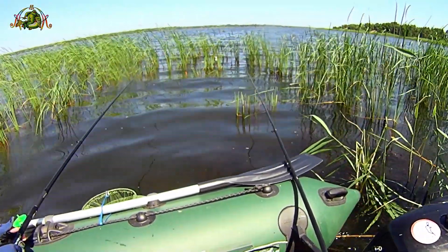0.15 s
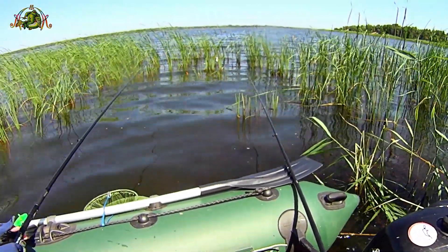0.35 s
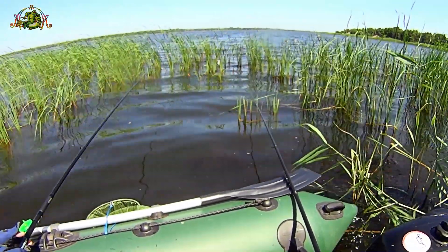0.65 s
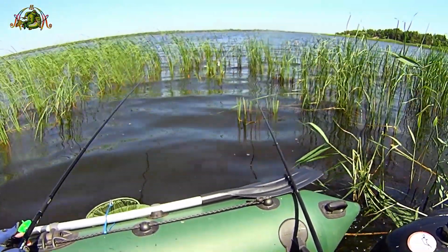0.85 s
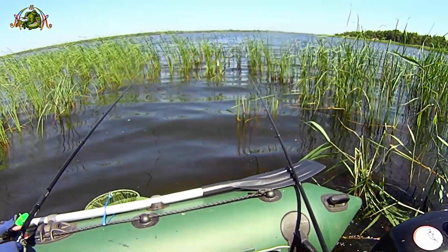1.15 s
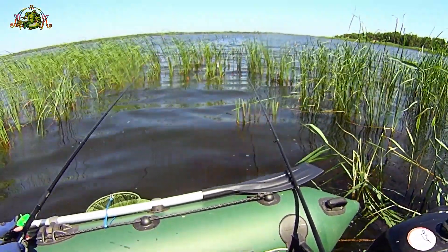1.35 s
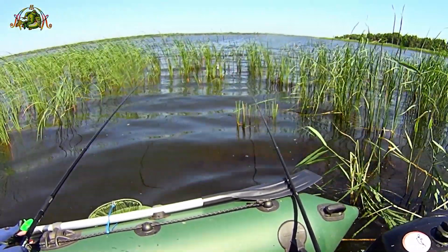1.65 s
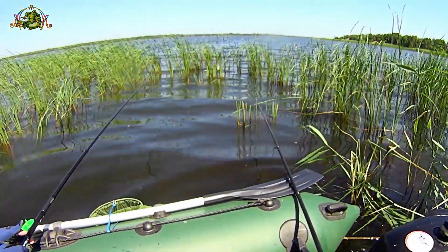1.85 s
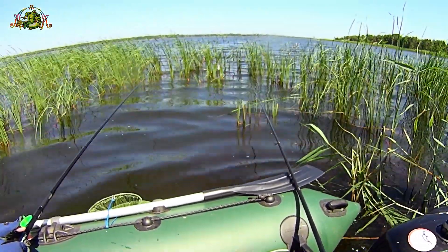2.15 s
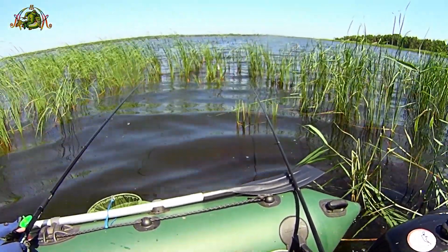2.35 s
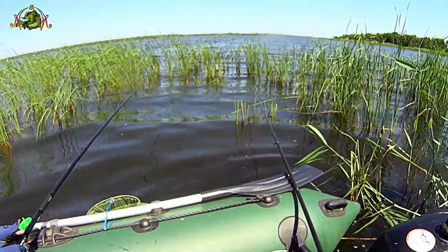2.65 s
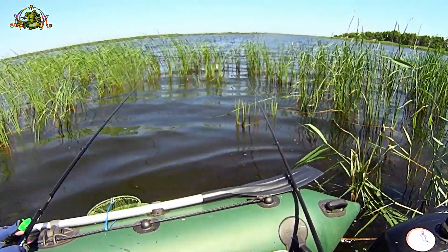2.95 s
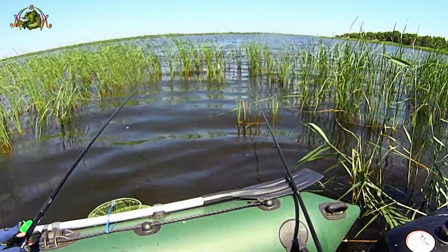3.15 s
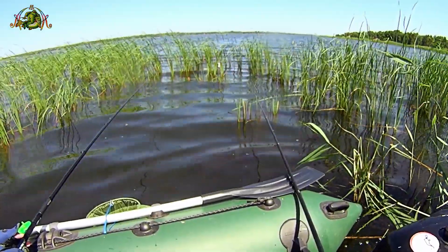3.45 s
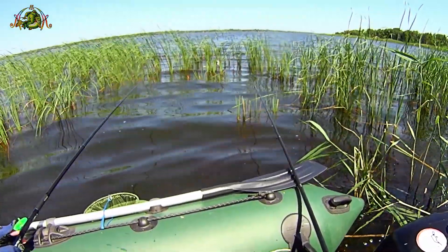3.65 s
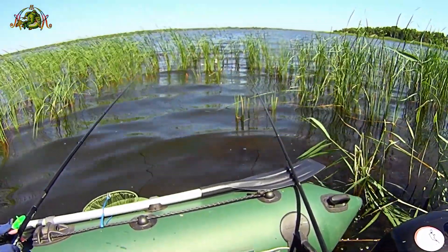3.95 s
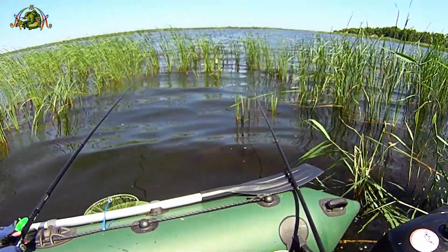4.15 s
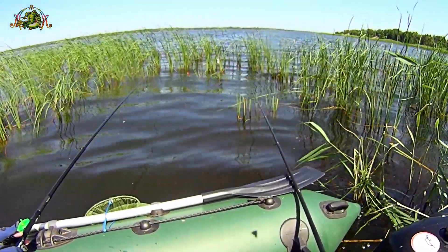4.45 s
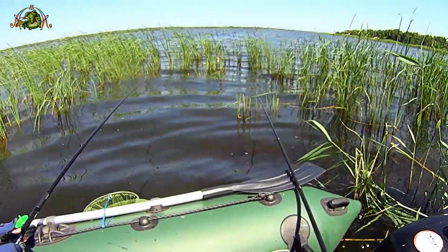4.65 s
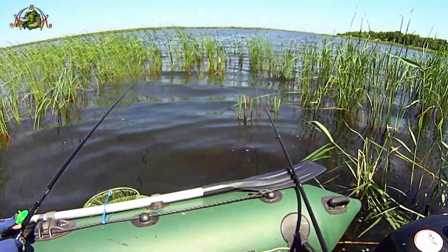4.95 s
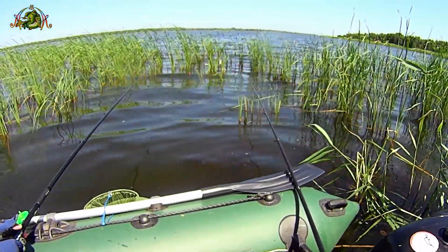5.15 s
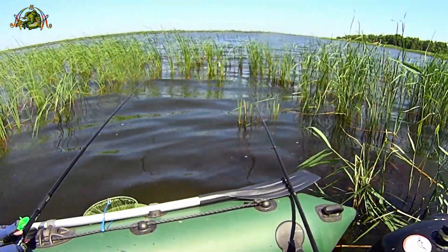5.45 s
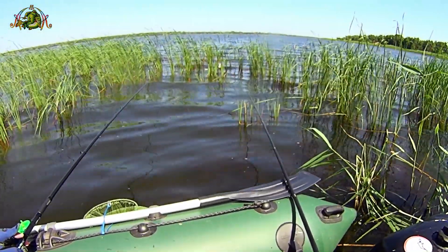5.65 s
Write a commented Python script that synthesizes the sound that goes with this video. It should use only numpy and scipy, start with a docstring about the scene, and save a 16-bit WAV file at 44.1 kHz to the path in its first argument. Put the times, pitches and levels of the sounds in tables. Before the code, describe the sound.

A small warbler sings in lakeside reeds, fairly close and slightly left, its notes lightly scattered by the stems. Soft chips come at 0.2 and 0.5 seconds, a faint rattle near 1.1, two more chips around 1.3 and a thin squeak at 1.6. From 1.9 to 2.8 seconds it gives four louder, ratcheting croaks, each rising slightly. A squeaky whistle follows at 3.0, then four harsh, quick rattles from 3.3 to 4.1. A cluster of squeaks jumps in pitch between 4.2 and 4.7. Four shorter rattles run from 4.8 to 5.5, and a last squeak sounds near 5.8. Tiny water drips tick during the first 1.6 seconds, and wavelets nudge a rubber boat with very faint low thuds at 1.3 and 2.2. A soft, wide hiss, a faint low hum and distant warbler chatter continue throughout.

```python
"""Reed warbler beside a rubber boat.

On a quiet lake the bird sings chips, low croaks and harsh rattles: runs of short tone puffs
with a rasp. Squeaky whistles come between them, and the reed stems scatter the song.
Water drips and nudges the hull over a soft hiss, a faint hum and far warblers."""
import sys
import numpy as np
from scipy import signal
from scipy.fft import rfft, irfft
from scipy.io import wavfile

SR = 44100
rng = np.random.default_rng(int(sys.argv[2]) if len(sys.argv) > 2 else 0)


def store_pcm(level_fs):
    """Save levels as 16-bit WAV."""
    pcm = np.round(np.clip(level_fs, -1, 1) * 32767).astype(np.int16)
    wavfile.write(sys.argv[1], SR, np.atleast_2d(pcm).T)


N = 255735
TIME = np.arange(N) / SR
FREQS = np.fft.rfftfreq(2 * N, 1 / SR)


def from_db(db):
    """Decibels to gain."""
    return 10 ** (np.asarray(db) / 20)


def unit_rms(x):
    """Scale to rms 1."""
    return x / np.sqrt(np.mean(x ** 2) + 1e-20)


def at_hz(table, hz, column=1):
    """Interpolate a table column over log frequency."""
    table = np.array(table)
    return np.interp(np.log(hz + 1e-3), np.log(table[:, 0]), table[:, column])


def filtered(x, response):
    """Apply a frequency response given on FREQS."""
    return irfft(rfft(x, 2 * N) * response)[..., :N]


def noise(response):
    """Filtered white noise, rms 1."""
    return unit_rms(filtered(rng.standard_normal(N), response))


def coloured(spectrum):
    """Noise shaped by rows of (Hz, dB), rms 1."""
    return noise(from_db(at_hz(spectrum, FREQS)))


def band(hz, width_oct):
    """Noise in a bell around hz, rms 1."""
    return noise(np.exp(-(np.log2((FREQS + 1) / hz) / width_oct) ** 2 / 2))


def drift(rate_hz):
    """Random wander up to about rate_hz, rms 1."""
    return noise(1 / (1 + (FREQS / rate_hz) ** 2))


def hiss(mid_db=-55.5, side_db=-55):
    """Wide, steady hiss: one part common to both channels, one opposed."""
    # Each row: frequency in Hz, relative noise density in dB.
    mid_spectrum = [(15, -18), (25, -6), (101, -5), (134, -7), (202, -5), (267, -6), (1300, -10),
                    (1400, -10), (5120, -8.5), (11000, -15), (14300, -104), (22000, -120)]
    side_spectrum = [(15, -47), (25, -13), (107, -15), (202, -7.5), (619, -3.5), (759, -4.5), (884, -3.5),
                     (7320, -13), (11000, -37), (14300, -71), (22000, -120)]
    mid = from_db(mid_db) * coloured(mid_spectrum)
    side = from_db(side_db) * coloured(side_spectrum)
    return np.array([mid + side, mid - side])


def hum(hz=133.7, db=-68, waver_hz=1.7, waver_db=2):
    """Faint hum, wavering in level and pitch."""
    gain = from_db(db + waver_db * drift(35))
    return gain * np.sin(2 * np.pi * np.cumsum(hz + waver_hz * drift(1.57)) / SR)


def far_warblers(db=-63, hz=2700, width_oct=0.25, chatter_hz=16, chatter_db=5):
    """Warblers deep in the reeds merge into a faint, restless chatter."""
    gain = from_db(db + chatter_db * drift(chatter_hz))
    return gain * np.array([band(hz, width_oct), band(hz, width_oct)])


def hull(tube_hz=116, width_s=0.024):
    """The boat's air tube answers each wavelet with a soft low note."""
    # Each row: centre time in seconds, peak level in dB.
    nudges = [(1.321, -60), (2.21, -56.5)]
    out = np.zeros(N)
    for centre_s, db in nudges:
        t = TIME - centre_s
        out += from_db(db) * np.exp(-(t / width_s) ** 2 / 2) * np.sin(2 * np.pi * tube_hz * t)
    return out


def drips(decay_s=0.0083, width_oct=0.84):
    """Tiny splashes and stem ticks: milliseconds of bright crackle."""
    # Each row: start in seconds, level in dB, band centre in Hz.
    ticks = [(0.051, -51.5, 6200), (0.416, -44.5, 5840), (0.542, -50.5, 5635), (0.704, -51, 5600),
             (1.249, -46.5, 5670), (1.393, -48, 5170), (1.585, -44.5, 3780)]
    out = np.zeros(N)
    for start_s, db, hz in ticks:
        decay = (TIME > start_s) * np.exp(-np.abs(TIME - start_s) / decay_s)
        out += from_db(db) * decay * band(hz, width_oct)
    return out


def reeds(x, near_db=-14, near_t60_s=0.1, far_db=-19, far_t60_s=0.47, build_s=0.0052):
    """Close stems scatter the sound at once; the wider reed bed returns a faint tail."""
    impulse = 0
    for db, t60_s in ((near_db, near_t60_s), (far_db, far_t60_s)):
        envelope = np.exp(-np.log(1000) * TIME / t60_s) * (1 - np.exp(-TIME / build_s))
        echoes = rng.standard_normal((2, N)) * envelope
        impulse += from_db(db) * unit_rms(echoes) / np.sqrt(N)
    return filtered(x, rfft(impulse, 2 * N))


def from_the_left(x):
    """The song reaches the left channel earlier and mostly louder."""
    # Each row: frequency in Hz, left phase lead in radians, left minus right in dB.
    bearing = [(2330, 1.93, 0.5), (2720, 2.34, 2.5), (2780, 3.5, 5.5), (3374, 1.37, -1), (4330, 3.72, 7),
               (5000, 5.73, 2)]
    lead_rad, louder_db = at_hz(bearing, FREQS), at_hz(bearing, FREQS, column=2)
    left = from_db(louder_db / 2) * np.exp(0.5j * lead_rad)
    return filtered(x, np.array([left, 1 / left]))


def whistles(edge_s=0.024, scatter=0.132, droop=0.022, droop_s=0.004, waver_db=1.2, harmonics=8):
    """Harmonic squeaks shaped by the throat; an unsteady pitch smears them into a screech."""
    # Whistles and their rough onsets. Each row: start and end in seconds, start and end pitch in Hz,
    # level in dB, tilt in dB per octave, roughness from 0 to 1.
    notes = [ (1.596, 1.682, 1363, 1386, -41, 3, 0.11), (2.977, 3.025, 1420, 1363, -40, 1, 0.65),
             (2.989, 3.085, 1319, 1290, -34, 0.5, 0.02), (3.07, 3.109, 1288, 1270, -42.5, 10.5, .1),
             (4.249, 4.316, 1483, 1447, -37, 5.5, 0.51), (4.312, 4.352, 1863, 1867, -34.5, 1.5, 0.11),
             (4.36, 4.441, 1454, 1402, -31, 1.5, 0.11), (4.517, 4.564, 2360, 2390, -34, 3.5, 0.43),
             (4.547, 4.62, 1763, 1803, -33, 4.5, 0.13), (4.62, 4.696, 1378, 1412, -31.5, 1, 0.12),
             (5.711, 5.806, 1356, 1388, -46.5, -6, 0.58), (5.749, 5.83, 1392, 1389, -35, 6, 0.22)]
    # Response of throat and open bill. Each row: frequency in Hz, gain in dB.
    throat = [(1350, -22.5), (1800, -18.5), (2300, -8), (2620, 4), (3200, -17.5), (3700, 11), (4250, -3),
              (4700, 1), (5300, -10.5), (6400, -25.5), (8600, -45), (10400, -25.5), (11500, -50)]
    out, shake = np.zeros(N), drift(466)
    wavers_db = [waver_db * drift(70) for _ in range(harmonics)]
    for start_s, end_s, start_hz, end_hz, db, tilt_db_per_oct, roughness in notes:
        on = (TIME > start_s) & (TIME < end_s)
        t = TIME[on]
        glide_hz = np.interp(t, [start_s, end_s], [start_hz, end_hz])
        sag = droop * np.exp((t - end_s) / droop_s)  # pressure drops at the end
        hz = glide_hz * np.exp(scatter * roughness * shake[on] - sag)
        phase = 2 * np.pi * np.cumsum(hz) / SR
        swell = np.sin(np.pi / 2 * np.clip(np.minimum(t - start_s, end_s - t) / edge_s, 0, 1))
        for k, wander_db in enumerate(wavers_db, 1):
            colour_db = at_hz(throat, k * hz) + tilt_db_per_oct * np.log2(k * hz / 3700)
            out[on] += swell * from_db(db + colour_db + wander_db[on]) * np.sin(k * phase)
    return out


def puff_run(start_s, end_s, db, swell_db, gap_s=0.0105):
    """Times and levels of evenly spaced puffs that rise by swell_db to db."""
    count = 1 + round((end_s - start_s) / gap_s)
    progress = np.linspace(1, 0, count)[::-1]  # a lone puff falls on end_s
    return start_s + progress * (end_s - start_s), db - swell_db * (1 - progress)


def syllable(times_s, levels_db, start_hz, end_hz, rasp_db):
    """One glide over some puffs. Each row: time in seconds, level in dB, pitch in Hz, rasp in dB."""
    pitches_hz = np.interp(times_s, times_s[[0, -1]], [start_hz, end_hz])
    return np.column_stack([times_s, levels_db, pitches_hz, np.full(len(times_s), rasp_db)])


def chip(start_s, end_s, db, start_hz, end_hz, rasp_db):
    """A lone pair of puffs."""
    return syllable(*puff_run(start_s, end_s, db, swell_db=1.5), start_hz, end_hz, rasp_db)


def croak(at_s, db, stretch, start_hz=2345, end_hz=2545, rasp_db=-21.5, fray_db_per_s=64):
    """A ratchet of beats on a rising pitch, loudest in the middle, raspiest at the end."""
    # Each row: start and end in seconds from at_s before stretching, relative end level in dB,
    # swell in dB.
    beats = [(-0.034, -0.017, -12.5, 4.5), (0.002, 0.011, -2.5, 1.5), (0.03, 0.043, 0, 2.5),
             (0.057, 0.058, -0.5, 0), (0.092, 0.11, -10, 0.5)]
    runs = [puff_run(from_s, to_s, db + end_db, swell_db) for from_s, to_s, end_db, swell_db in beats]
    offsets_s, levels_db = np.concatenate(runs, axis=1)
    frayed_db = rasp_db + fray_db_per_s * offsets_s
    return syllable(at_s + stretch * offsets_s, levels_db, start_hz, end_hz, frayed_db)


def rattle(start_s, end_s, lead_gap_s, db, start_hz, end_hz, rasp_db, accent_db=3.5, scratch_db=8.5):
    """Three slow, scratchy puffs swell into a quick run that ends on an accent."""
    run_s, run_db = puff_run(start_s, end_s, db, swell_db=0)
    run_db[-1] += accent_db
    ahead_s = lead_gap_s * np.arange(3, 0, -1)
    lead_db = db - 13 * (ahead_s / (end_s - start_s)) ** 1.5
    times_s, levels_db = np.r_[start_s - ahead_s, run_s], np.r_[lead_db, run_db]
    return syllable(times_s, levels_db, start_hz, end_hz, rasp_db + scratch_db * (times_s < start_s))


def song():
    """The puffs of all syllables in time order."""
    # Each row: time in seconds, level in dB, stretch factor.
    croaks = [(1.905, -17, 0.9), (2.15, -15.5, 0.99), (2.467, -15.5, .99), (2.715, -14.5, .86)]
    # Each row: run start, run end and lead-in gap in seconds, level in dB, start and end pitch in Hz,
    # relative rasp in dB.
    rattles = [ (1.061, 1.112, 0.018, -32.5, 2510, 2272, -13.5),
               (3.314, 3.369, 0.026, -19, 2613, 2482, -15), (3.532, 3.587, 0.02, -19, 2590, 2473, -14.5),
               (3.839, 3.899, 0.022, -20, 2737, 2461, -14), (4.056, 4.114, 0.023, -18.5, 2740, 2479, -15),
               (4.857, 4.889, 0.021, -19.5, 2550, 2588, -12.5),
               (5.016, 5.045, 0.016, -19, 2566, 2669, -13.5), (5.31, 5.337, 0.017, -20, 2660, 2512, -15),
               (5.48, 5.507, 0.0145, -19, 2614, 2521, -14)]
    # Each row: start and end in seconds, level in dB, start and end pitch in Hz, relative rasp in dB.
    chips = [(0.188, 0.197, -32, 2435, 2414, -16), (0.491, 0.499, -29.5, 2403, 2344, -17),
             (1.254, 1.268, -24, 2500, 2676, -13), (1.388, 1.396, -28, 2543, 2730, -7)]
    puffs = np.vstack([croak(*row) for row in croaks]
                      + [rattle(*row) for row in rattles]
                      + [chip(*row) for row in chips])
    return puffs[np.argsort(puffs[:, 0])]


def puff_train(times_s, levels_db, hz, width_s=0.0029, spread_s=0.0004, spread_db=1, spread_hz=35):
    """Tone and airflow envelope of uneven puffs; each starts more abruptly than it ends."""
    tone, power = np.zeros(N), np.zeros(N)
    for at_s, db in zip(times_s, levels_db):
        start_cycles, detune, late, strong = rng.standard_normal(4)
        span = slice(int((at_s - 0.012) * SR), int((at_s + 0.012) * SR))
        puff_s = width_s * np.exp(0.011 * (db + 20))  # strong puffs last longer
        age = (TIME[span] - at_s - spread_s * late) / puff_s
        steepness = np.where(age < 0, 4, 2.5)
        puff = from_db(db + spread_db * strong) * np.exp(-np.abs(age) ** steepness / 2)
        cycles = start_cycles + np.cumsum(hz[span] + spread_hz * detune) / SR
        tone[span] += puff * np.sin(2 * np.pi * cycles)
        power[span] += puff ** 2
    return tone, np.sqrt(power)


def turbulence(flow, rasp_db, trim_db=-3, leak_db=-6, smooth_hz=14):
    """Turbulent rasp; air leaks between the puffs, so it also swells with the whole note."""
    # Each row: frequency in Hz, relative noise density in dB.
    spectrum = [(1000, -50), (1350, -22), (1850, -84), (2150, 2.5), (2800, 16.5), (3400, 3), (3800, -2),
                (4300, -4.5), (4800, -15.5), (5300, -11.5), (6300, -20), (8200, -20), (11000, -24.5)]
    leak = np.abs(filtered(flow, np.exp(-(FREQS / smooth_hz) ** 2 / 2)))
    return (flow + from_db(leak_db) * leak) * from_db(rasp_db + trim_db) * coloured(spectrum)


def growl(flow, rasp_db, pitch_hz, base_db=-22, slack_hz=2500, slack_db_per_oct=85):
    """Slack membranes growl faintly below the tone, most in low, hoarse notes."""
    level_db = base_db + 0.82 * rasp_db + slack_db_per_oct * np.log2(slack_hz / pitch_hz)
    return flow * from_db(level_db) * band(hz=1420, width_oct=0.27)


def syrinx(jitter_hz=85, rebound_s=0.005, rebound_db=-2.5, tone_db=1, flutter=0.2, throat_hz=2020):
    """The syrinx opens in short puffs. Returns their fluttering tone and their rasp with its growl."""
    times_s, levels_db, pitches_hz, rasps_db = song().T
    glide_hz, rasp_db = np.interp(TIME, times_s, pitches_hz), np.interp(TIME, times_s, rasps_db)
    # a weaker puff follows each one at once
    times_s, levels_db = np.r_[times_s, times_s + rebound_s], np.r_[levels_db, levels_db + rebound_db]
    tone, flow = puff_train(times_s, levels_db, glide_hz + jitter_hz * drift(500))
    tone *= from_db(tone_db) * (1 + flutter * band(hz=240, width_oct=0.45))
    # the small throat radiates little below its resonance
    tone = signal.sosfilt(signal.butter(8, throat_hz, "high", fs=SR, output="sos"), tone)
    return tone, turbulence(flow, rasp_db) + growl(flow, rasp_db, glide_hz)


def scene(tone_send_db=-2, rasp_send_db=10, whistle_send_db=2):
    """The bird among the reeds, with the lake around the boat."""
    tone, rasp = syrinx()
    squeaks = whistles()
    direct = from_the_left(tone + rasp + squeaks)
    scattered = reeds(from_db(tone_send_db) * tone + from_db(rasp_send_db) * rasp
                      + from_db(whistle_send_db) * squeaks)
    return direct + scattered + far_warblers() + drips() + hull() + hiss() + hum()


def record(dry, cutoff_hz=11200):
    """Steep low-pass."""
    return signal.sosfilt(signal.ellip(10, 0.3, 60, cutoff_hz, fs=SR, output="sos"), dry)


dry = scene()
out = record(dry)
store_pcm(out)
```